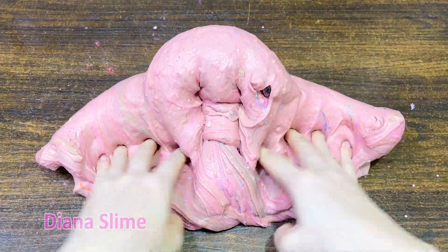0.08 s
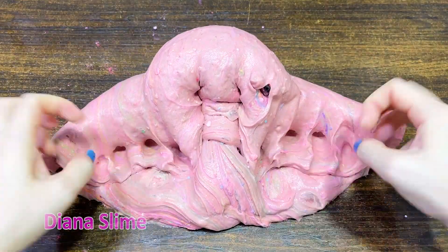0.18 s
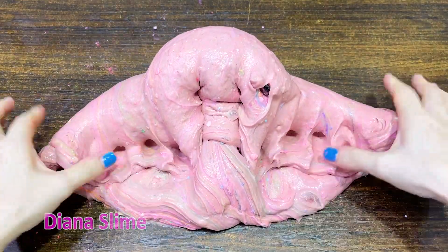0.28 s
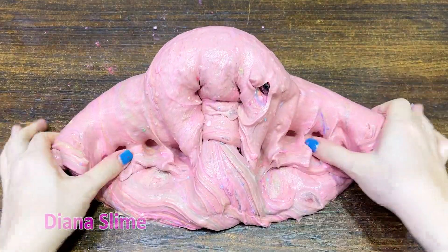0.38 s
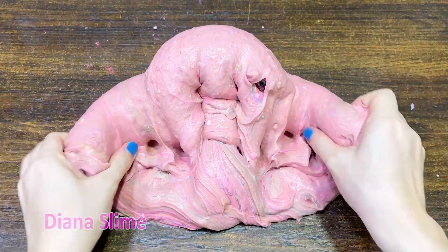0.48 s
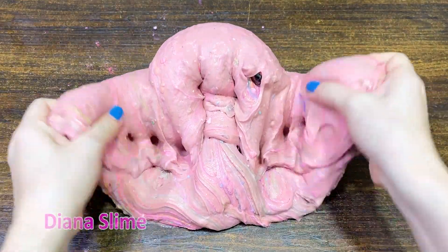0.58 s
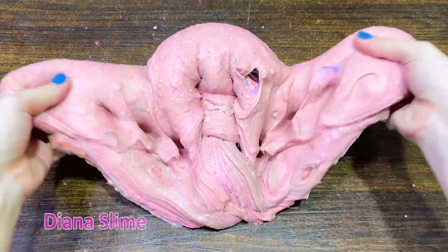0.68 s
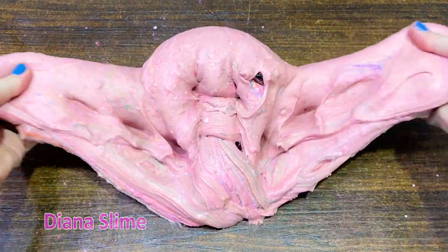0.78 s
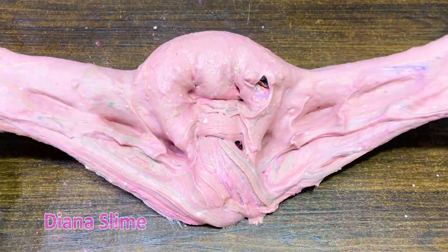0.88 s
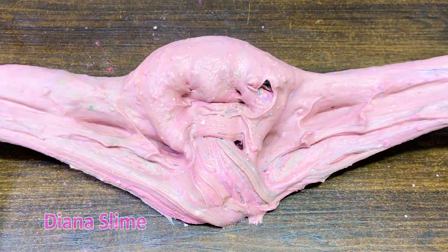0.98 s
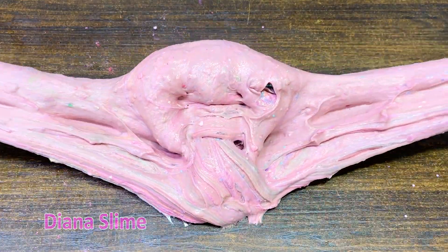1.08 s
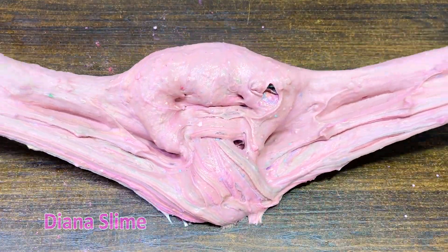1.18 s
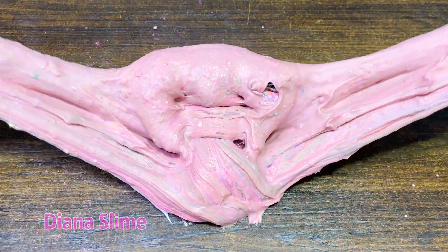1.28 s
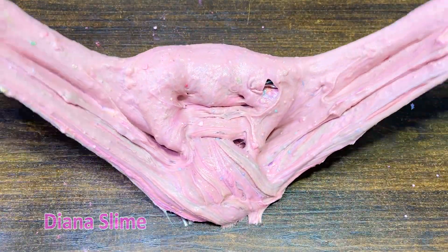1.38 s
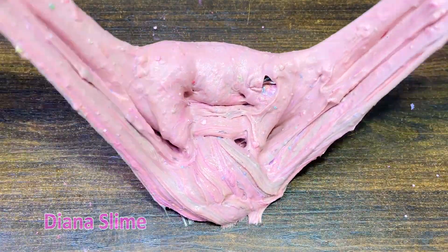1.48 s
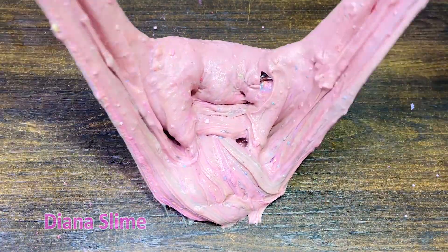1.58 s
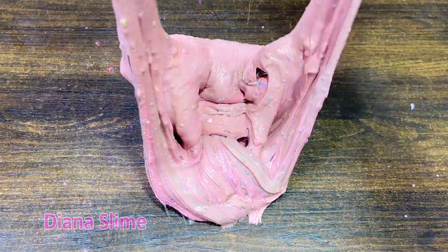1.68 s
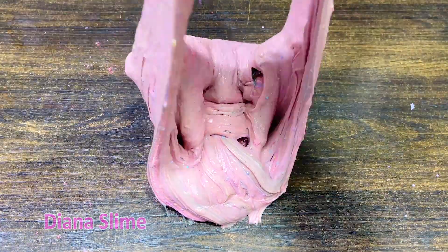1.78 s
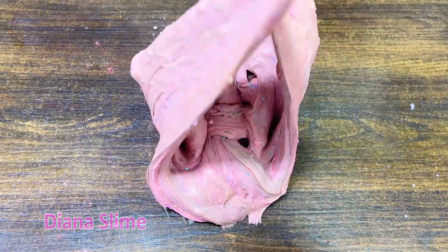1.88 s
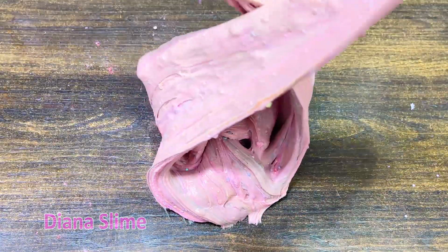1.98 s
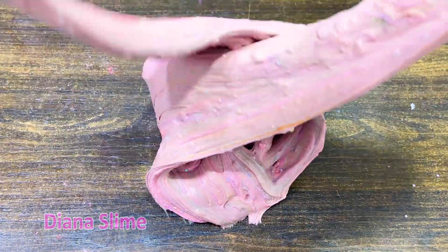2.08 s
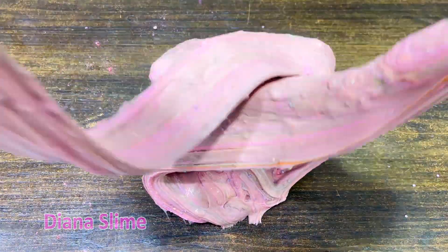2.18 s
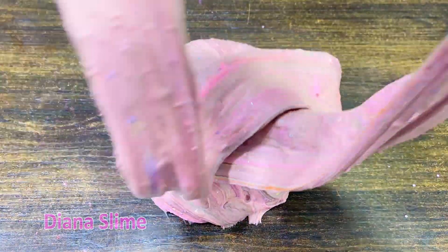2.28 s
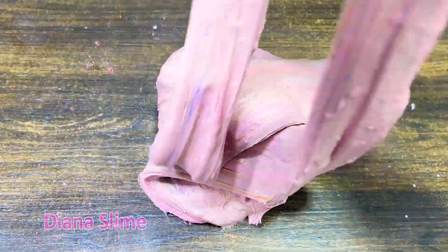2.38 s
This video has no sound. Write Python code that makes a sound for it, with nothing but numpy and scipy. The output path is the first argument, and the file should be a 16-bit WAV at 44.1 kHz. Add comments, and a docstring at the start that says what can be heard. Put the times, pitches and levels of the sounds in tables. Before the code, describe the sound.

Close to a stereo microphone in a quiet room, slime tears wetly off fingers, then pops and crackles in a squeeze. It thins into a soft fizz as it stretches and lands gently on the table.

```python
"""Sticky slime on a table

A big lump in a small quiet room, close to a stereo microphone pair. Fingers pull out of it with a
tearing squelch and hollow plops, squeeze its sides, then draw it into long fizzing strands. Tiny
bursting films make the crackle, trapped air bubbles snap throughout, and a last fold lands with a thud."""
import sys
import numpy as np
from scipy import signal
from scipy.fft import rfft, irfft
from scipy.io import wavfile

SR = 44100
rng = np.random.default_rng(int(sys.argv[2]) if len(sys.argv) > 2 else 0)


def put_to_file(sound):
    """Save the sound as 16-bit audio at rate SR, in the file named by the first command-line argument."""
    columns = np.atleast_2d(sound).T  # one column per channel
    safe = np.clip(columns, -1, 1)
    whole_steps = np.round(safe * 32767)
    wavfile.write(sys.argv[1], SR, whole_steps.astype(np.int16))


N = 105840
T = np.arange(N) / SR
HZ = np.maximum(np.arange(N + 1) * SR / (2 * N), 1)
CUTOFF_HZ = 16000
# Spectrum of small bubbles opening on the surface: (frequency [Hz], density [dB])
FIZZ_SPECTRUM = [(500,-23),(1200,-16),(2000,-12),(3000,-10),(5000,-9),(7500,-10),(9200,-9.5),(11200,-3.5),(14000,-0.5),(15800,-7.5)]


def from_db(db):
    """Decibels to gain."""
    return 10 ** (np.asarray(db) / 20)


def unit_rms(x):
    """Scale to unit rms."""
    return x / np.sqrt(np.mean(x ** 2) + 1e-20)


def level(rows, column=1):
    """Gain in time from one dB column; silent outside the gesture."""
    rows = np.array(rows)
    return from_db(np.interp(T, rows[:, 0], rows[:, column])) * (T >= rows[0, 0]) * (T <= rows[-1, 0])


def per_hz(points):
    """Read a table on a log-frequency axis."""
    hz, value = np.transpose(points)
    return np.interp(np.log(HZ), np.log(hz), value)


def filtered(x, response):
    """Apply a frequency response."""
    return irfft(rfft(x, 2 * N) * response)[..., :N]


def resonance(x, hz, width_hz):
    """Two-pole resonance with gain 1 at its peak."""
    r = np.exp(-np.pi * width_hz / SR)
    gain = (1 - r * r) / 2
    return signal.lfilter([gain, 0, -gain], [1, -2 * r * np.cos(2 * np.pi * hz / SR), r * r], x + 1e-18)


def panned(x, db):
    """Mono to stereo, the left louder by db."""
    return np.array([x * from_db(db / 2), x * from_db(-db / 2)])


def dying(start, decay_s, attack_s=0.0019):
    """A quick rise and an exponential fall."""
    t = np.maximum(T - start, 0)
    return np.minimum(t / attack_s, 1) * np.exp(-t / decay_s)


def soft_tone(start, hz, swell_s, decay_s):
    """A damped tone that swells and dies away."""
    t = np.maximum(T - start, 0)
    rise = np.sin(np.pi / 2 * np.minimum(t / swell_s, 1)) ** 2
    fall = np.exp(-np.maximum(t - swell_s, 0) / decay_s)
    return rise * fall * np.sin(2 * np.pi * hz * t)


def crackle(spectrum, per_s, spread_db, q, scatter_db=3.5, bands=20):
    """Tiny films burst at random, each with its own size, place and briefly ringing pitch; rms 1."""
    # Reflections off hands and table, different at each microphone: (frequency [Hz], level [dB])
    reflections = [(300,-18.5),(700,-8),(1200,-10),(2500,-4.5),(4500,-6),(8000,-9),(11000,-16),(14000,-11.5)]
    out, power = np.zeros((2, N)), 0
    for hz in np.linspace(np.sqrt(400), np.sqrt(15500), bands) ** 2:
        bursts = rng.random(N) < per_s / bands / SR
        sizes = from_db(spread_db * np.minimum(rng.exponential(1, N), 4)) * rng.choice([-1, 1], N)
        direct = unit_rms(panned(bursts * sizes, scatter_db * rng.standard_normal(N)))
        diffuse = from_db(np.interp(hz, *np.transpose(reflections))) * rng.standard_normal((2, N))
        out += resonance(direct + diffuse, hz, hz / q)
        ring = resonance(1. * (T == 0), hz, hz / q)
        power += abs(rfft(ring, 2 * N)) ** 2
    colour = from_db(per_hz(spectrum)) / np.sqrt(power + .01)  # evens out the overlapping bands
    return unit_rms(filtered(out, colour * (HZ < CUTOFF_HZ)))


def room_tone(level_db=-62, side_db=-10):
    """Steady low rush of the room with a faint hiss."""
    # The quiet room: (frequency [Hz], density [dB])
    spectrum = [(20,-39),(36,-24.5),(48,-7),(66,6.5),(100,-7.5),(145,6),(200,-7.5),(330,-3.5),(480,-6.5),(680,4.5),(850,-4),(1200,-20.5),(2500,-26),(6500,-28.5),(8000,-9),(9500,-25.5),(14500,-27.5),(16000,-35)]
    mid, side = filtered(rng.standard_normal((2, N)), from_db(per_hz(spectrum)))
    return from_db(level_db) * unit_rms(mid + from_db(side_db) * np.array([side, -side]))


def touches():
    """Fingers brush the tacky surface and leave a brief rustle."""
    # Light touches: (time [s], level [dB], decay [s])
    contacts = [(.0,-62,.05),(0.034,-73,0.015),(0.448,-54.5,0.043),(2.376,-59,0.014)]
    # Tacky rustle: (frequency [Hz], density [dB])
    spectrum = [(500,-9),(1500,-2),(4000,-0.5),(7000,-2.5),(11000,-3),(14500,8),(15800,-8)]
    envelope = sum(from_db(db) * dying(start, decay_s) for start, db, decay_s in contacts)
    return envelope * crackle(spectrum, per_s=20000, spread_db=5, q=4.1)


def snaps(spray_db=-21.5, spray_s=.0009, size=1024):
    """A bubble wall breaks: one click and a short spray ring its small cavity."""
    # Trapped air bubbles: (time [s], peak [dB], pitch [Hz], width [Hz], left over right [dB])
    bubbles = [(0.0331,-28,13580,3000,1),(0.259,-6.5,6500,5000,-9),(0.263,-7.5,8100,9000,-7),(.2640,-6.5,2640,2500,-6),
               (.4482,-35,1800,1440,8.5),(.4483,-38.5,10500,3000,2),(.4900,-33,5140,2000,-1),(0.4977,-43,2560,1000,18),(.5001,-32,7500,8100,-6),(0.5044,-17.5,11200,7000,0),(0.504,-35.5,1935,1180,13),(.5052,-40,950,202.6,3.5),
               (0.532,-26.5,6000,3960,2),(0.5638,-26.5,7800,9000,0),(.5699,-35,1750,700,0),(0.5909,-19.5,11000,9000,-7),(0.5891,-33,1900,1500,-4),(0.6842,-16,11000,8000,-12),(0.6839,-27,1980,1800,0),(0.6867,-18.5,12000,5000,3),(.6998,-22.5,11000,8000,-5),
               (0.7464,-20,14200,700,9),(.7551,-4,6840,3000,-0.5),(0.7552,-7,14200,1500,-1),(0.7933,-10,14020,1600,0),(.8402,-22,13800,2000,-3),(0.9217,-26.5,11600,2000,-2),(0.9607,-31.5,4930,1500,3),
               (1.0075,-34,13000,4000,0),(1.0432,-40,2830,1000,6),(1.067,-41,1670,704,8),(1.0659,-40,4670,2500,4),(1.085,-15,8050,1820,-5),(1.0847,-15.5,12300,3000,1),(1.0953,-37,3100,700,7),(1.1053,-29,7200,1200,1),
               (1.1768,-35.5,4770,1800,-4),(1.2036,-32,5700,2200,-1),(1.2419,-27,13800,1300,-1),(1.2755,-39.5,4050,1510,-1),(1.293,-52.5,1050,300,10),
               (1.3778,-35,9700,3000,-1),(1.4706,-42,1990,1200,1),(1.4967,-34,7300,2000,1),(1.5158,-24,14300,1500,-2),(2.2212,-41.5,11950,5950,3.5),(2.3747,-39,11250,9070,-3.5),(2.3747,-47,4230,2206,6)]
    out, t = np.zeros((2, N + size)), T[:size]
    for start, db, hz, width_hz, pan_db in bubbles:
        click = t == 0
        spray = from_db(spray_db) * rng.standard_normal(size) * np.exp(-t / spray_s)
        band = signal.butter(2, [hz / 2, CUTOFF_HZ], "band", fs=SR, output="sos")
        snap = signal.sosfilt(band, resonance(click + spray, hz, width_hz))
        i = int(start * SR)
        out[:, i:i + size] += panned(from_db(db) * snap / abs(snap).max(), pan_db)
    return out[:, :N]


def peel():
    """Slime tears away from the fingers in a fine and a coarse crackle."""
    # Fingers pull out: (time [s], fine level [dB], coarse level [dB])
    pull = [(.155,-71,-76.5),(.18,-50.5,-55),(.192,-38.5,-49),(.217,-27.5,-39.5),(.229,-42,-38),(.245,-30,-36),(.254,-20,-28.5),(.263,-17.5,-23.5),(.273,-30.5,-26),(.291,-32,-26),(.304,-40,-55.5),(.335,-66,-65.5)]
    # The two layers of the tearing: (frequency [Hz], density [dB])
    fine = [(1500,-22.5),(3000,-15.5),(4500,-5),(6500,-1),(9000,-5),(10900,0.5),(12500,-1),(14300,5.5),(15800,-5.5)]
    coarse = [(100,-34),(400,-1),(650,-4.5),(1000,-8),(1500,1),(2000,2.5),(3200,0),(5000,-1.5),(9000,-26)]
    return (level(pull) * crackle(fine, per_s=7800, spread_db=2, q=3.4)
            + level(pull, column=2) * crackle(coarse, per_s=6400, spread_db=3, q=4))


def plops():
    """Finger holes open and suck in air, one hollow tone each."""
    # Air pockets: (time [s], peak [dB], pitch [Hz], swell [s], decay [s])
    pockets = [(.206,-46.5,450,0.0051,0.016),(.2245,-23.5,317,0.0092,0.0054),(.2470,-34,360,0.0053,0.0072),(.2570,-21,294,0.0051,0.003),(.2655,-16.5,335,0.0048,0.0037),(.278,-29.5,459,0.0056,0.0089)]
    return sum(from_db(db) * soft_tone(start, *tone) for start, db, *tone in pockets)


def room_boom(start_s=.268, swell_s=0.021):
    """The room rings on with a low boom after the plops."""
    # Low modes of the room: (frequency [Hz], peak [dB], time to fall 60 dB [s])
    modes = [(66,-48,.42),(200.2,-47.5,.22),(266.8,-34,.24),(435.5,-40.5,.2),(616,-41.5,.17)]
    return sum(from_db(db) * soft_tone(start_s, hz, swell_s, t60 / np.log(1000)) for hz, db, t60 in modes)


def thuds():
    """The lump shifts and lands on the table, one low damped tone each time."""
    # Soft landings: (time [s], peak [dB], pitch [Hz], swell [s], decay [s])
    landings = [(.295,-37,74,0.017,0.02),(.44,-50.5,82,0.03,0.0098),(.645,-54,75,0.018,0.023),(.72,-60,81,0.012,0.037),(.945,-59.5,88,.025,0.015),(1.97,-67.5,69.8,0.027,0.026),(2.11,-57.5,136.8,0.12,0.059),(2.235,-48,136,.04,0.018),(2.25,-58,65,.03,0.07)]
    return sum(from_db(db) * soft_tone(start, *tone) for start, db, *tone in landings)


def slumps(width_share=.4):
    """Folds of slime slump against each other with dull, wet flops."""
    # Folds: (time [s], level [dB], decay [s], pitch [Hz])
    folds = [(0.445,-49.5,0.031,240),(0.499,-55,0.021,850),(.746,-53,0.043,600),(1.959,-55.5,0.049,604)]
    out = np.zeros(N)
    for start, db, decay_s, hz in folds:
        band = resonance(rng.standard_normal(N), hz, width_share * hz)
        flop = unit_rms(resonance(band, hz, width_share * hz))
        out += from_db(db) * dying(start, decay_s, attack_s=0.0068) * flop
    return out


def squeeze():
    """Both fists crush the foamy slime into a fine and a coarse crackle."""
    # The fists close: (time [s], fine level [dB], coarse level [dB])
    grip = [(.49,-72,-48.5),(.51,-48,-55),(.54,-48,-51),(.565,-41,-45),(.66,-41.5,-44.5),(.71,-34.5,-41),(.765,-28.5,-46),(.80,-34,-47),(.825,-45,-57.5),(.88,-55,-58)]
    # The two layers of the crushing: (frequency [Hz], density [dB])
    fine = [(1500,-22.5),(3500,-11.5),(5500,-14),(7500,-11),(9000,-13.5),(11000,-7.5),(12800,-6),(14200,0.5),(15800,-14)]
    coarse = [(200,-18),(600,-15.5),(900,-4),(1300,-2),(1900,2.5),(2600,-0.5),(3800,-5.5),(6000,-23.5)]
    return (level(grip) * crackle(fine, per_s=20000, spread_db=4.5, q=3)
            + level(grip, column=2) * crackle(coarse, per_s=4000, spread_db=3, q=2.35))


def stretch(blisters_db=-14.5):
    """Countless small bubbles and a few larger blisters open on the stretching surface."""
    # Strands are drawn out: (time [s], level [dB])
    draw = [(.8,-41),(.87,-51),(1.0,-50.5),(1.1,-48),(1.19,-52),(1.28,-53),(1.42,-55.5),(1.48,-55.5),(1.54,-54),(1.61,-53.5),(1.66,-53),(1.695,-59),(1.742,-47),(1.775,-50),(1.81,-57.5),(1.86,-74)]
    # Larger bubbles among the fizz: (frequency [Hz], density [dB])
    blister_spectrum = [(600,-3.5),(1200,-2.5),(2000,0),(3200,0),(5000,-0.5),(7000,-23),(10000,-21)]
    fizz = crackle(FIZZ_SPECTRUM, per_s=22000, spread_db=5, q=5.9)
    blisters = crackle(blister_spectrum, per_s=590, spread_db=3.5, q=3.1)
    return level(draw) * (fizz + from_db(blisters_db) * blisters)


def sizzles(width_share=0.51):
    """A patch of the slime's skin gives way: small bubbles of like size burst together."""
    # Patches: (time of peak [s], level [dB], half length [s], pitch [Hz])
    patches = [(1.31,-60,0.099,3250),(1.599,-55.5,0.032,4850),(1.76,-47.5,0.039,14200)]
    grains = crackle(FIZZ_SPECTRUM, per_s=9000, spread_db=3, q=3.2)
    out = np.zeros((2, N))
    for peak_s, db, half_s, hz in patches:
        envelope = from_db(db) * np.exp(-((T - peak_s) / half_s) ** 2)
        out += envelope * unit_rms(resonance(grains, hz, width_share * hz))
    return out


def room(x, t60_s=0.24, gap_s=0.0019):
    """Diffuse reflections of the small room, different at each microphone."""
    # Colour of the reflections: (frequency [Hz], gain [dB])
    colour = [(100,6),(400,7.5),(700,8),(1300,-8.5),(3000,5),(6000,-0.5),(10000,1),(16000,-8.5)]
    tail = rng.standard_normal((2, N)) * from_db(-60 * T / t60_s) * (T > gap_s)
    tail /= np.sqrt(np.sum(tail ** 2, axis=1, keepdims=True))
    return filtered(x, rfft(tail, 2 * N) * from_db(per_hz(colour)))


def scene():
    """The slime from close by, with the room behind it."""
    crackles = peel() + squeeze() + stretch() + sizzles() + touches()
    pops, hollows = snaps(), plops()
    wide_reverb = room(from_db(-14) * crackles + from_db(-11.5) * pops)
    centre_reverb = from_db(-12.5) * room(hollows).mean(axis=0)
    direct = crackles + pops + hollows + thuds() + slumps()
    return direct + wide_reverb + centre_reverb + room_boom() + room_tone()


def record(dry):
    """The two microphones of the close pair differ in level and phase; the top treble is cut."""
    # Balance of the pair: (frequency [Hz], left over right [dB])
    balance = [(100,1.5),(900,-0.5),(2000,0),(4000,3),(7500,5),(9300,5.5),(11500,-0.5),(16000,1.5)]
    # Phase between the pair: (frequency [Hz], lead of the left [rad])
    phase = [(300,0),(700,-.3),(1100,.3),(2500,0),(4000,.7),(6000,.6),(8000,.1),(9800,.7),(11300,-.1),(13350,-3.14),(15300,-6.2),(17000,-6.3)]
    left_lead = np.array([np.exp(1j * per_hz(phase)), np.ones(N + 1)])
    pair = panned(1, per_hz(balance)) * left_lead
    top_cut = signal.cheby2(16, 70, CUTOFF_HZ + 1100, fs=SR, output="sos")
    return signal.sosfilt(top_cut, filtered(dry, pair))


dry = scene()
out = record(dry)
put_to_file(out)
```